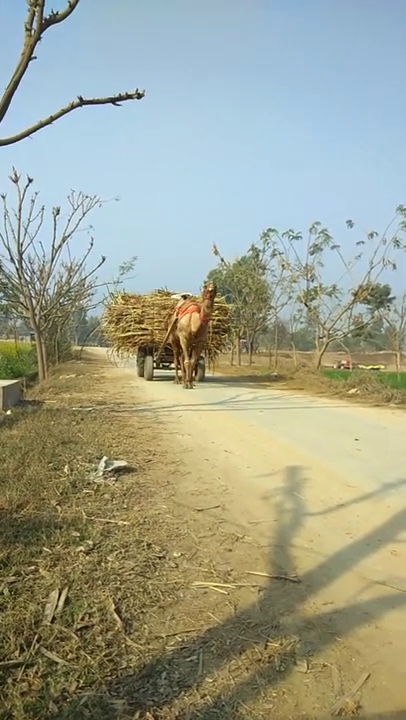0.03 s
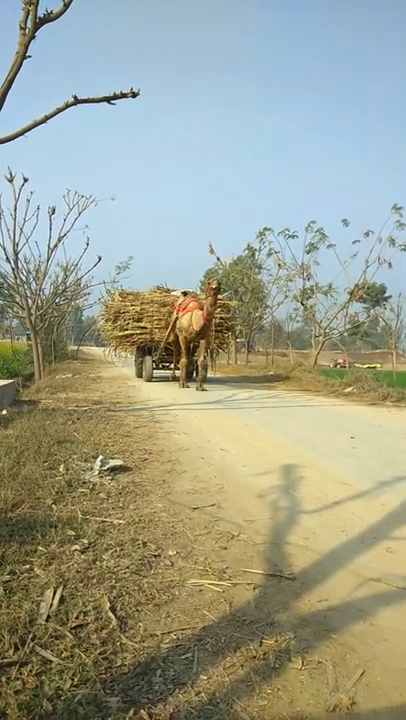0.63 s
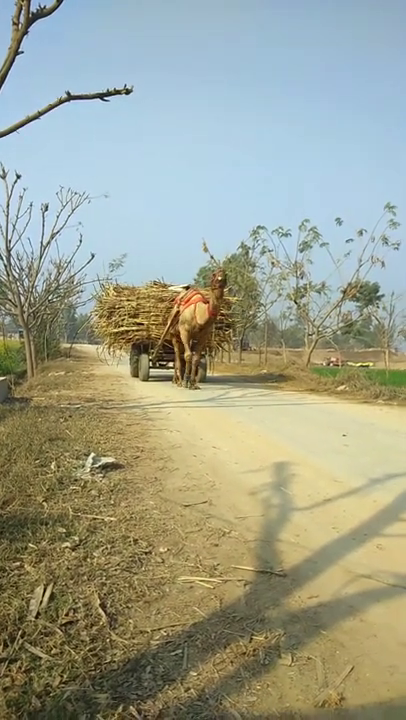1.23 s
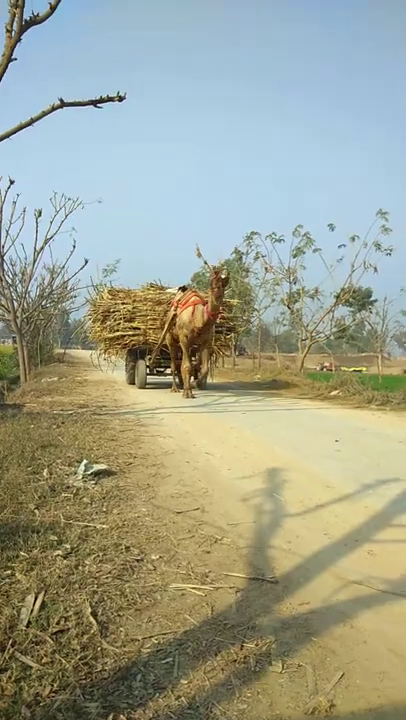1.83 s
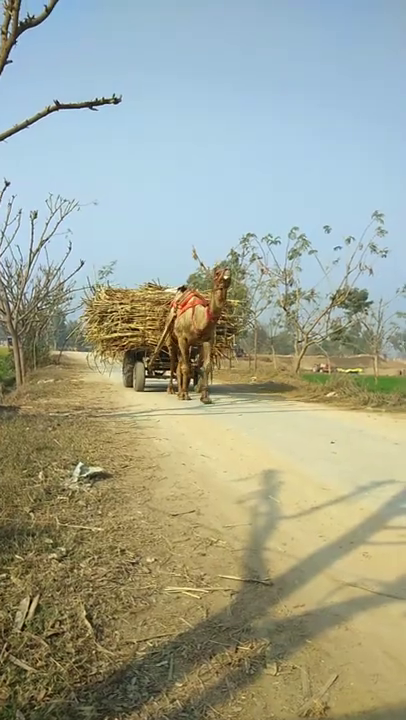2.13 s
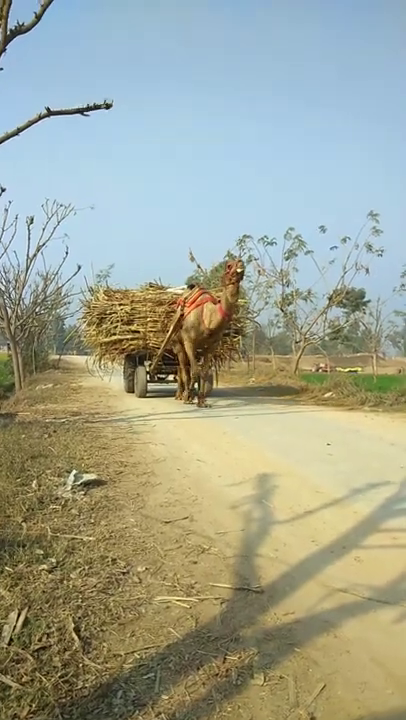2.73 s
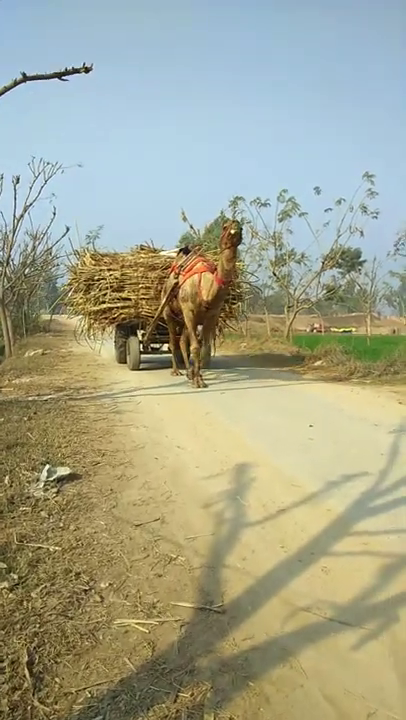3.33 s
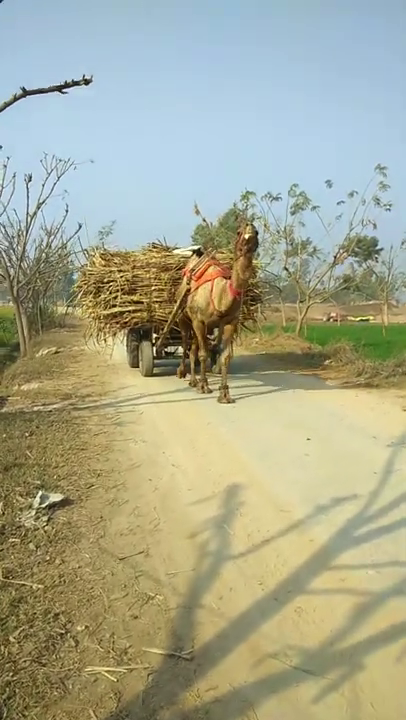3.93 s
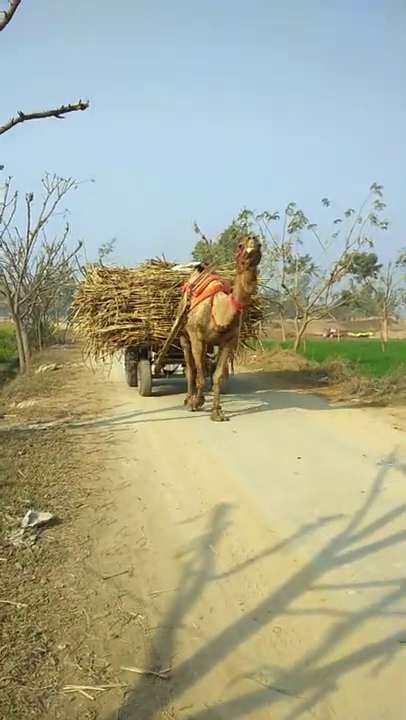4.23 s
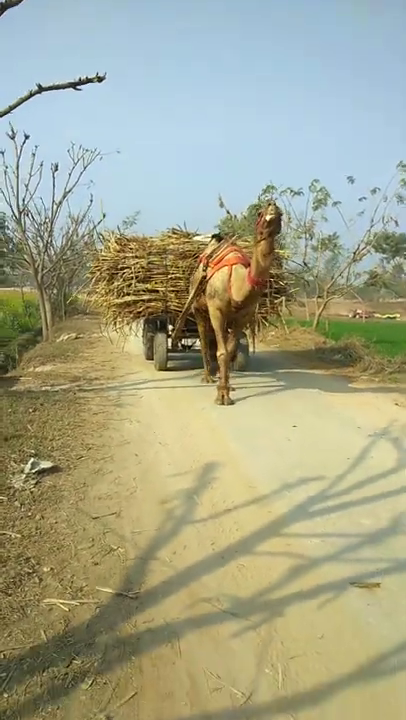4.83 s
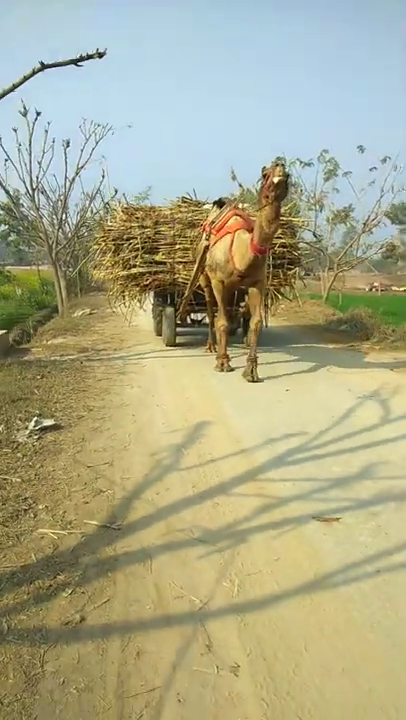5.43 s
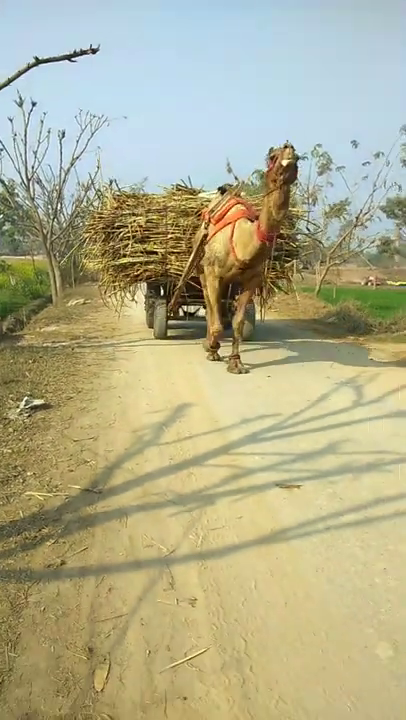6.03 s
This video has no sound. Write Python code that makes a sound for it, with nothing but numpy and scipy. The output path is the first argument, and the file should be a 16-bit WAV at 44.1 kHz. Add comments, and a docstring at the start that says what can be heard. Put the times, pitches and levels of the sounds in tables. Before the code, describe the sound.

A camel cart approaches on a dusty country road, its bright metal bells jingling in uneven swells, with sharper clashes from bunches at the neck and chest. Feet and cart knock dully, tyres crunch softly and a distant engine thuds faintly. A low hum fades early, and the bells grow somewhat louder. The scene sits on the left of a handheld microphone, with soft handling bumps and rumble on the right.

```python
"""Pellet bells jingle without pause on the legs of a camel pulling a loaded cart closer along a country road.
Each pellet impact excites the damped modes of a metal shell; heavier bunches at neck and chest clash with
the stride. Feet and cart knock softly, tyres crunch on dust, a far engine thuds and a faint drone fades early.
The left microphone of a phone hears all this; the right is all but deaf to airborne sound and picks up
mainly the structure-borne bumps and rumble of the hand."""
import sys
import numpy as np
from scipy import signal
from scipy.fft import rfft, irfft
from scipy.io import wavfile

SR = 44100
rng = np.random.default_rng(int(sys.argv[2]) if len(sys.argv) > 2 else 0)


def inscribe(sig):
    """Save sig as 16-bit PCM at rate SR to the path in sys.argv[1].

    A 1-D sig is mono; a 2-D sig holds one channel per row.
    Samples are clipped to [-1, 1] before scaling.
    """
    pcm = np.round(np.clip(np.atleast_2d(sig).T, -1, 1) * 32767)
    wavfile.write(sys.argv[1], SR, pcm.astype(np.int16))


N = 268569
TOP_HZ = 15650  # upper limit of the weak partials and of the phone's passband

# strong modes of the leg bells: f/Hz, level/dB
LEG_PARTIALS = [(2047, -9), (2181, -13), (2295, -11), (2577, -28), (2721, 5), (2852, 6.5), (2930, 5.5),
                (3115, -10), (3507, -5), (3985, -12), (4083, 0), (4639, -6), (5023, -13), (5160, 0),
                (5462, -11), (5670, 1), (5785, -10), (6198, -4.5), (6602, 7.5), (6694, -2.5), (6828, -16),
                (7036, -4), (7171, -4), (7605, -15), (7714, -9.5), (7820, 6), (8084, -20), (8182, -3.5),
                (8350, -3), (8425, -13), (9050, -30), (9598, -8), (9915, -25), (10436, -10)]
# spectral envelope of the crowd of weaker partials between them: f/Hz, level/dB
LEG_CROWD_SPECTRUM = [(1500.0, -29.5), (2100.0, 3.5), (2700.0, 6.5), (3300.0, 4), (3750.0, -5),
                      (4100.0, 3.5), (4500.0, -4.5), (5400.0, 2.5), (6600.0, 0), (8100.0, 5), (9300.0, -4),
                      (11000.0, -8), (13000.0, -7.5), (15300.0, -10.5)]
def leg_bells(impacts_per_s=480, scatter_db=3.5, turnover_per_s=55, level_db=0.1, active_bells=4):
    """Impact excitation: pellets strike as hard as the legs swing, in a few ever-changing bells at a time."""
    bells = bell_rings(LEG_PARTIALS, LEG_CROWD_SPECTRUM, t60=.09, crowd_t60=.085, crowd_db=4,
                       attack_s=.0004, count=28)
    pellet_rng = np.random.default_rng(rng.integers(2 ** 31))
    jitter, pick, quantile = pellet_rng.random((int(impacts_per_s * N / SR), 3)).T
    times = (np.arange(len(jitter)) + jitter) / impacts_per_s
    force = undb(-scatter_db * np.log(1 - quantile).clip(-4, 0))  # many light touches, few hard ones
    force *= np.sqrt(SR / impacts_per_s / np.mean(force ** 2))
    gains = leg_shaking()[:, (times * SR).astype(int)].T * undb(level_db) * force[:, None]
    queue = rng.integers(len(bells), size=4096)
    struck = queue[(times * turnover_per_s + pick * active_bells).astype(int)]
    out = np.zeros(N)
    for start, gain, bell in zip(times, gains, struck):
        add(out, start, gain @ bells[bell])
    return out


# swings of the legs: t/s, duration/s, level/dB, brightness/dB
LEG_SWINGS = [(0.0, 0.1, -35.5, 3.5), (0.123, 0.077, -42, -4), (0.256, 0.17, -43, 0), (0.422, 0.13, -38, 2),
              (0.533, 0.21, -41.5, 1), (0.792, 0.039, -42, -1), (0.832, .12, -39, -3.5),
              (0.996, 0.053, -45, -3.5), (1.138, 0.085, -48.5, 0), (1.222, 0.1, -37, 2.5),
              (1.344, 0.056, -44, 4.5), (1.385, 0.26, -37, 2), (1.605, 0.057, -34, 1),
              (1.658, 0.094, -36.5, -2.5), (1.752, 0.26, -41, 0), (1.968, .21, -38, 2.5),
              (2.257, 0.093, -40.5, 2), (2.41, 0.093, -33, -0.5), (2.524, 0.14, -45, 1.5),
              (2.715, .08, -47.5, 4), (2.817, 0.19, -38, 1.5), (2.993, 0.33, -36.5, 4),
              (3.197, 0.13, -37.5, -4.5), (3.32, 0.17, -41.5, 0.5), (3.503, 0.082, -38.5, 1.5),
              (3.611, 0.15, -34.5, 1.5), (3.875, 0.087, -30.5, 0), (4.045, 0.11, -33.5, -2),
              (4.231, .06, -34.5, -0.5), (4.316, 0.25, -40.5, 0.5), (4.41, 0.21, -37.5, 1),
              (4.598, 0.29, -33.5, 3.5), (4.885, 0.091, -29.5, 1), (4.984, 0.23, -40.5, 2),
              (5.21, .08, -40, 2.5), (5.304, .16, -33.5, 1.5), (5.478, 0.17, -35.5, 1.5),
              (5.703, 0.18, -36.5, 1), (5.886, .19, -46, 3.5)]
# light jingling between the swings: t/s, level/dB
IDLE_JINGLE = [(0, -42.5), (1.15, -55.5), (2.6, -47.5), (6.1, -55)]
# gain of the middle register, rising as the camel nears: t/s, level/dB
LEG_MIDDLE_GAIN = [(0, -3.5), (1.8, -3), (3.2, 0), (4.4, 1.5), (5.2, 2.5), (6.1, 4)]
def leg_shaking():
    """Incoherent addition: jingle and swings sum in power, giving an amplitude envelope per register."""
    power = np.tile(undb(curve(IDLE_JINGLE)) ** 2, (3, 1))
    for start, length, db, bright_db in LEG_SWINGS:
        swing = swell(start, length, attack_s=.015, release_s=.024)
        power += np.outer(register_gains(db, bright_db, 0) ** 2, swing ** 2)
    power[1] *= undb(curve(LEG_MIDDLE_GAIN)) ** 2
    return np.sqrt(power)


def bell_rings(modes, crowd, t60, crowd_t60, crowd_db, attack_s, count=16, crowd_size=60, size=6144):
    """Modal synthesis: each bell rings as a sum of damped sines. Returns bells x 3 registers x samples."""
    mode_hz, mode_db = np.transpose(modes)
    crowd_hz, crowd_spectrum = np.transpose(crowd)
    t = np.arange(size) / SR
    register_of_bin = np.searchsorted((4500, 7200), np.fft.rfftfreq(size, 1 / SR))  # edges in Hz
    register_masks = register_of_bin == np.arange(3)[:, None]

    def partials(hz, db, t60):
        gain = undb(db) * rng.standard_normal(len(hz))  # each bell is hit at another spot
        cycles = hz[:, None] * t + rng.random((len(hz), 1))
        tone = gain @ np.sin((2 * np.pi * cycles).astype(np.float32))
        ring = tone * ring_envelope(t, t60, attack_s)  # the pellet rolls in, so the ring builds up
        return ring / np.linalg.norm(ring)

    rings = []
    for _ in range(count):
        detune = 1 + .003 * rng.standard_normal(len(mode_hz))  # no two bells are cast alike
        strong = partials(mode_hz * detune, mode_db, t60)
        spread = (np.arange(crowd_size) + rng.random(crowd_size)) / crowd_size
        weak_hz = crowd_hz[0] + (TOP_HZ - crowd_hz[0]) * spread
        weak = partials(weak_hz, np.interp(weak_hz, crowd_hz, crowd_spectrum), crowd_t60)
        registers = irfft(rfft(strong + undb(crowd_db) * weak) * register_masks, size)
        registers[:, size // 2:] *= np.linspace(1, 0, size // 2)
        rings.append(registers / np.linalg.norm(registers, axis=1, keepdims=True))
    return np.array(rings)


def register_gains(db, bright_db, middle_db):
    """Spectral tilt: brightness tips the low and high registers about the middle one."""
    return undb([db - bright_db, db + middle_db, db + bright_db])


# strong modes of the neck bells: f/Hz, level/dB
NECK_PARTIALS = [(1783.0, -17), (2023.0, -9.5), (2202.0, -4.5), (2409.0, -7.5), (2575.0, 6), (2670.0, -3.5),
                 (2814.0, 3.5), (2965.0, -3.5), (3265.0, -12.5), (3458.0, -6), (3592.0, -6), (3767.0, -35),
                 (3962.0, -8), (4066.0, -17.5), (4640.0, -4.5), (5186.0, -7.5), (5279.0, 10),
                 (5480.0, -10.0), (5722.0, -21.5), (6320.0, 1.5), (6574.0, -16), (7637.0, -34),
                 (7788.0, -13), (8316.0, -2), (8683.0, -29), (9069.0, -9), (9470.0, -37), (9768.0, -35),
                 (9917.0, -6.5), (12147.0, -8)]
# spectral envelope of their weaker partials: f/Hz, level/dB
NECK_CROWD_SPECTRUM = [(1500.0, -17.5), (2100.0, -15), (2700.0, 10), (3300.0, -2), (3750.0, -17),
                       (4100.0, -24), (4500.0, 1), (5400.0, 1), (6600.0, 7.5), (8100.0, -4), (9300.0, -13),
                       (11000.0, -17), (13000.0, -20), (15300.0, -12.5)]
# clashes at the neck: t/s, level/dB, brightness/dB, hardness (0-1)
NECK_IMPACTS = [(.055, -4, -8, 0.43), (.098, -2.5, -5.5, 0.41), (.411, -5.5, -1, .4), (.463, -5, 2, 0.25),
                (.673, -0.5, -4.5, .6), (.698, 3, -1.5, .4), (.851, 0.5, -3, 0.18), (.905, -5, -9.5, 0.28),
                (.925, -8, -4, .4), (.951, -7, -5, .4), (1.0, -4, -8.5, 0.47), (1.217, -12.5, -1, 0.66),
                (1.447, -1, 0, 0.55), (1.653, 2.5, -3.5, 0.69), (1.676, 3.5, -1, 0.36),
                (1.701, 3, -4, 0.32), (2.115, -8, 3, 0.6), (2.248, -6.5, 2, 0.45), (2.273, -1, -1, 0.44),
                (2.297, 5, -1.5, .6), (2.39, -6.5, 1, 0.52), (2.438, 2, -5.5, .5), (2.491, -4, -10.5, 0.26),
                (2.56, 1.5, -5, 0.56), (2.809, -4.5, 4.5, 0.6), (3.04, 3.5, 2, 0.32), (3.13, -3.5, 2, 0.46),
                (3.24, -1.5, 7, 0.33), (3.254, 1.5, -7, 0.52), (3.286, 0.5, -2.5, 0.53),
                (3.364, -2, -3.5, 0.47), (4.714, 6, 0.5, 0.31), (4.769, 0, -6.5, .7), (4.795, -10, -1, 0.4),
                (4.94, 2, -0.5, 0.31), (5.603, 10.5, -2.5, 0.49), (6.064, -6.5, -4, 0.4)]
def neck_bells():
    """Free vibration: the heavy bunch at the neck rings darkly after each clash."""
    bells = bell_rings(NECK_PARTIALS, NECK_CROWD_SPECTRUM, t60=.13, crowd_t60=.095, crowd_db=2,
                       attack_s=.0006)
    return clashes(NECK_IMPACTS, bells, middle_db=-2, rebound_s=.0045)


# strong modes of the chest bells: f/Hz, level/dB
CHEST_PARTIALS = [(1796.0, -15.5), (2071.0, -7), (2404.0, 1), (2559.0, 5), (2752.0, 8), (2955.0, -2),
                  (3439.0, -7), (4021.0, -17), (4428.0, -3), (4756.0, -21), (4881.0, -5.5), (5025.0, 1),
                  (5281.0, -6), (5465.0, 7.5), (5724.0, -2), (5824.0, 2), (6129.0, -40), (6307.0, 6),
                  (6472.0, -3.5), (6827.0, -24), (7105.0, -12), (7500.0, -23), (7607.0, 12), (7824.0, -7),
                  (8018.0, -37), (9035.0, -28), (9309.0, 3.5), (9705.0, -21), (10295.0, -1), (11098.0, -27)]
# spectral envelope of their weaker partials: f/Hz, level/dB
CHEST_CROWD_SPECTRUM = [(1500.0, -8.5), (2100.0, -34), (2700.0, -6), (3300.0, 11), (3750.0, 0), (4100.0, 4),
                        (4500.0, -10), (5400.0, 5), (6600.0, -4), (8100.0, 4), (9300.0, -16),
                        (11000.0, -13), (13000.0, -10), (15300.0, -10)]
# clashes at the chest: t/s, level/dB, brightness/dB, hardness (0-1)
CHEST_IMPACTS = [(3.604, -7.5, 2, .35), (3.877, -0.5, 1.5, 0.43), (3.904, 1.5, -3.5, 0.25),
                 (3.928, 9.5, -0.5, 0.55), (4.009, -3.5, 1, 0.23), (4.036, -7, 7, 0.27),
                 (4.071, 7.5, 0, 0.48), (4.122, 2, -1.5, 0.36), (4.21, -6.5, 1, .25), (4.24, 3, -1, 0.42),
                 (5.325, -9, -5, 0.53), (5.371, -5, -0.5, 0.4), (5.507, -8, -5, 0.5), (5.604, 2, 4, 0.71),
                 (5.726, -10, 7.5, .25), (5.764, 2, 2.5, 0.38), (5.778, 1, -1, 0.5), (5.796, 0, 1.5, 0.42),
                 (5.842, -1.5, 1.5, 0.45), (5.92, -7.5, -1, 0.6), (5.985, -13, 4, 0.72)]
def chest_bells():
    """Free vibration: the bunch on the chest strap rings brightly, with a strong middle register."""
    bells = bell_rings(CHEST_PARTIALS, CHEST_CROWD_SPECTRUM, t60=.13, crowd_t60=.095, crowd_db=.3,
                       attack_s=.0007)
    return clashes(CHEST_IMPACTS, bells, middle_db=7, rebound_s=.004)


def clashes(impacts, bells, middle_db, rebound_s, rebounds=8):
    """Energy partition: hardness is the first blow's share; softer landings leave bells tumbling longer."""
    out = np.zeros(N)
    for start, db, bright_db, hardness in impacts:
        forces = np.sqrt(np.r_[hardness, np.full(rebounds, (1 - hardness) / rebounds)])
        quantiles = (np.arange(rebounds) + rng.random(rebounds)) / (rebounds + .5)
        delays = np.r_[0, -rebound_s / hardness * np.log(1 - quantiles)]  # contacts crowd, then thin out
        gains = register_gains(db, bright_db, middle_db)
        for delay, force, bell in zip(delays, forces, rng.permutation(len(bells))):
            add(out, start + delay, force * gains @ bells[bell])
    return out


# modes of one loose bell: f/Hz, level/dB
LOOSE_PARTIALS = [(3985, -8), (4082, 0), (4171, -9), (4294, -12), (4639, -5.5)]
# its occasional shakes: t/s, duration/s, level/dB
LOOSE_BURSTS = [(2.965, .08, -40), (3.646, 0.082, -38.5), (4.518, 0.28, -35.5), (4.872, 0.097, -31.5),
                (5.4, .08, -41.5)]
def loose_bell(taps_per_s=140, size=8192):
    """Convolution: each uneven bounce of the pellet sets off the same impulse response of the shell."""
    mode_hz, mode_db = np.transpose(LOOSE_PARTIALS)
    t = np.arange(size) / SR
    tone = undb(mode_db) @ np.sin(2 * np.pi * mode_hz[:, None] * t)
    ring = tone * ring_envelope(t, t60=.095, attack_s=.00064)
    taps = (rng.random(N) < taps_per_s / SR) * rng.standard_normal(N)
    jingle = signal.fftconvolve(taps, ring)[:N]
    shakes = sum(undb(db) * swell(start, length, attack_s=.068, release_s=.04)
                 for start, length, db in LOOSE_BURSTS)
    return shakes * jingle / jingle.std()


# blows of feet and cart: t/s, level/dB, centre f/Hz, T60/s
FOOT_AND_CART_BLOWS = [(0.366, -40.5, 690, 0.049), (.432, -44, 500, 0.043), (0.932, -41.5, 715, 0.058),
                       (1.369, -48, 600, 0.05), (1.485, -56, 396, 0.035), (1.948, -41.5, 536, 0.042),
                       (2.211, -39.5, 634, 0.025), (2.855, -44, 960, 0.065), (2.958, -48, 480, 0.065),
                       (3.666, -38, 590, 0.068), (4.318, -40.5, 594, 0.058), (4.696, -42.5, 440, 0.062),
                       (4.796, -42.5, 540, 0.035), (5.072, -43, 520, 0.051), (5.472, -46, 500, 0.052),
                       (5.987, -43.5, 500, 0.037)]
def knocks(softness=.052, gain_db=.5, size=4096):
    """Heavy damping: foot pads and wood give dull noise bursts; the longer ones also rise more slowly."""
    out, t = np.zeros(N), np.arange(size) / SR
    for start, db, hz, t60 in FOOT_AND_CART_BLOWS:
        spectrum = [(hz / 6, -8), (hz / 2, -1), (hz, 0), (hz * 1.7, -7), (hz * 3, -26), (hz * 10, -55)]
        envelope = ring_envelope(t, t60, attack_s=softness * t60)
        add(out, start, undb(db + gain_db) * noise(spectrum, size) * envelope / envelope.max())
    return out


# rolling noise of the tyres: t/s, level/dB
TYRE_LEVEL = [(0, -49), (1.2, -53), (2.5, -50), (3.6, -47.5), (4.3, -49), (5, -47), (6.1, -48.5)]
# its spectrum: f/Hz, level/dB
TYRE_SPECTRUM = [(60, -21), (250, 1.5), (400, -0.5), (700, -6), (1200, -6), (2500, -11), (6000, -4.5),
                 (15000, -18)]
def tyres(patchy_db=3, patches=110, split_hz=550):
    """Random amplitude modulation: uneven dust makes the low and high bands swell and sink separately."""
    crunch = noise(TYRE_SPECTRUM, N)
    low = signal.sosfiltfilt(signal.butter(2, split_hz, fs=SR, output="sos"), crunch)
    position = np.linspace(0, patches - 1, N)
    out = np.zeros(N)
    for band in (low, crunch - low):
        unevenness = np.interp(position, np.arange(patches), rng.standard_normal(patches))
        out += band * undb(patchy_db * unevenness)
    return undb(curve(TYRE_LEVEL)) * out


# bumps of the hand on the phone: t/s, peak level/dB, cutoff f/Hz
HAND_PUSHES = [(1.083, -25, 360), (1.255, -38, 200), (1.485, -36, 376), (1.949, -28.5, 776),
               (1.984, -37, 170), (2.354, -42, 700), (2.382, -35, 493), (2.463, -41, 300),
               (2.826, -38, 200), (3.209, -42, 300), (3.826, -42, 280), (4.153, -39, 220),
               (4.421, -40.5, 170), (4.799, -38, 380), (4.915, -31.5, 128), (5.068, -42, 150),
               (5.235, -39.5, 500)]
def hand_bumps(low_cut_hz=80, size=4096):
    """Transient response: a soft push on the case swings back through the microphone's low cut."""
    out = np.zeros(N)
    for start, db, cutoff_hz in HAND_PUSHES:
        push = signal.lfilter(*signal.butter(3, cutoff_hz, fs=SR), signal.unit_impulse(size))
        swing = signal.lfilter(*signal.butter(3, low_cut_hz, "high", fs=SR), push)
        add(out, start, undb(db) * swing / abs(swing).max())
    return out


# shifts of the grip: t/s, duration/s, level/dB, left minus right level/dB
GRIP_SHIFTS = [(.005, .03, -59, -16), (0.4, .03, -52.5, 22), (0.591, 0.025, -51.5, 21),
               (0.936, 0.045, -50, 24), (1.265, 0.034, -44, 5), (1.314, 0.046, -55, -15),
               (1.445, 0.029, -46, 13), (1.61, .05, -53.5, -14), (1.954, 0.033, -46, -17),
               (2.345, .12, -51.5, -20), (2.48, 0.12, -59.5, -15), (2.693, 0.064, -50, -17),
               (2.816, 0.037, -46, -23), (2.88, 0.039, -57, -19), (3.149, 0.11, -50.5, -16),
               (3.415, .04, -59.5, -12), (3.68, .05, -61, -16), (3.81, 0.083, -57, -20),
               (3.95, 0.046, -58, -19), (4.135, 0.029, -51.5, -20), (4.222, .07, -56, -16),
               (4.383, 0.076, -50, -18), (4.612, 0.095, -49, -16), (4.793, 0.023, -43.5, -23),
               (4.895, 0.057, -48, -16), (4.986, .1, -51, -21), (5.227, 0.036, -55, -18),
               (5.342, 0.031, -54, -20), (5.41, 0.031, -63, -12), (5.57, 0.19, -55.5, -20),
               (5.807, .08, -60.5, -16), (6.035, 0.035, -55, -23)]
# spectrum of handling rumble: f/Hz, level/dB
HAND_SPECTRUM = [(20, -36), (40, -14), (65, 4), (100, 4), (160, -10), (250, -22.5), (400, -39), (800, -51),
                 (2000, -65)]
def hand_rubs():
    """Structure-borne sound: the shifting hand rumbles most in the nearer of the two microphones."""
    grip = np.zeros((2, N))
    for start, length, db, pan_db in GRIP_SHIFTS:
        gains = undb([db + pan_db / 2, db - pan_db / 2])
        grip += np.outer(gains, swell(start, length, attack_s=.011, release_s=.017))
    return grip * np.array([noise(HAND_SPECTRUM, N), noise(HAND_SPECTRUM, N)])


# low spectrum shared by the engine and the rumble of the air: f/Hz, level/dB
RUMBLE_SPECTRUM = [(20, -45), (40, -23), (65, 2), (90, 1), (160, -3), (240, -21.5), (400, -54), (900, -59)]
def far_engine(firing_hz=8.853, first_s=.045, level_db=-43, scatter_db=2, attack_s=.011, decay_s=.027):
    """Periodic pulse train: each firing of a far single-cylinder engine arrives as a soft, low thud."""
    period = 1 / firing_hz
    firing, since = np.divmod(np.arange(N) / SR - first_s + period, period)
    strength = undb(level_db + scatter_db * rng.standard_normal(int(firing[-1]) + 1))
    envelope = np.minimum(since / attack_s, 1) * np.exp(-since / decay_s)
    return strength[firing.astype(int)] * envelope * noise(RUMBLE_SPECTRUM, N)


# spectrum of a faint, distant drone: f/Hz, level/dB
DRONE_SPECTRUM = [(120, -45), (165, -4), (177, 0), (190, -19), (260, -39)]
def drone(level_db=-55.5):
    """Narrow-band noise: heard as a low, wavering hum, which fades early."""
    envelope = swell(start=0, length=1.1, attack_s=.029, release_s=.23)
    return undb(level_db) * envelope * noise(DRONE_SPECTRUM, N)


# spectrum of the faint hiss on the right: f/Hz, level/dB
HISS_SPECTRUM = [(100, 12), (400, 2), (700, -1), (1200, -5), (3000, -4), (6000, -10), (10000, -17.5),
                 (15000, -14)]
def noise_floor(left_db=-51.5, right_db=-56.5, hiss_db=-63):
    """Stationary noise: a steady low rumble at each microphone, with faint hiss on the right."""
    left = undb(left_db) * noise(RUMBLE_SPECTRUM, N)
    right = undb(right_db) * noise(HAND_SPECTRUM, N) + undb(hiss_db) * noise(HISS_SPECTRUM, N)
    return np.array([left, right])


def noise(spectrum, size):
    """Spectral shaping: white noise weighted by (f/Hz, level/dB) points and scaled to unit rms."""
    hz, db = np.transpose(spectrum)
    gain = undb(np.interp(np.log(np.fft.rfftfreq(size, 1 / SR) + 1), np.log(hz), db))
    shaped = irfft(rfft(rng.standard_normal(size)) * gain, size)
    return shaped / shaped.std()


def ring_envelope(t, t60, attack_s):
    """Exponential damping of 60 dB per t60 seconds, with a rounded onset."""
    return np.exp(-np.log(1000) * t / t60) * (1 - np.exp(-t / attack_s))


def swell(start, length, attack_s, release_s):
    """Amplitude envelope: a linear rise, then exponential decay from length seconds after the start."""
    t = np.arange(N) / SR - start
    return np.clip(t / attack_s, 0, 1) * np.exp(-np.clip((t - length) / release_s, 0, 20))


def curve(rows):
    """Linear interpolation of (t/s, value) rows at every sample."""
    return np.interp(np.arange(N) / SR, *np.transpose(rows))


def undb(db):
    """Level in decibels to amplitude ratio."""
    return 10 ** (np.asarray(db) / 20)


def add(track, start, sound):
    """Superposition of a sound on a track from start seconds."""
    i = int(np.clip(start * SR, 0, N - 1))
    track[i:i + len(sound)] += sound[:N - i]


def scene():
    """Two transmission paths: airborne sound reaches mainly the left microphone, bumps mainly the right."""
    bells = leg_bells() + neck_bells() + chest_bells() + loose_bell()
    airborne = bells + knocks() + tyres() + far_engine() + drone()
    bumps = hand_bumps()
    left = airborne + undb(-27) * bumps
    right = undb(-63) * airborne + bumps
    return np.array([left, right]) + noise_floor() + hand_rubs()


def record(dry, ceiling=.85):
    """Soft saturation and band limiting: the highest peaks are gently rounded, and the phone cuts the top."""
    rounded = dry / (1 + (dry / ceiling) ** 4) ** .25
    return signal.sosfilt(signal.ellip(10, .2, 80, TOP_HZ, fs=SR, output="sos"), rounded)


dry = scene()
out = record(dry)
inscribe(out)
```